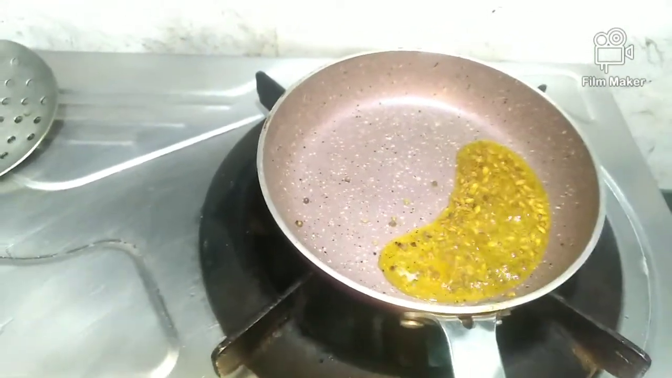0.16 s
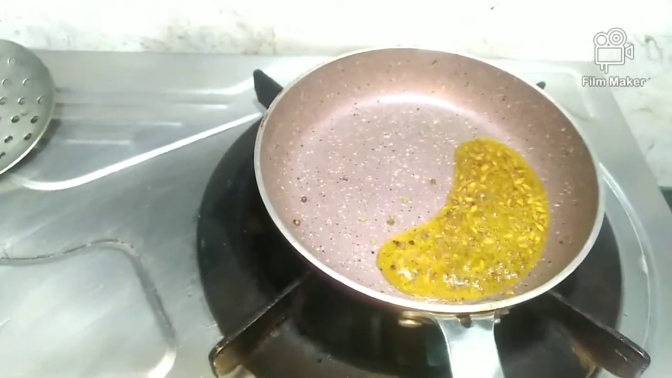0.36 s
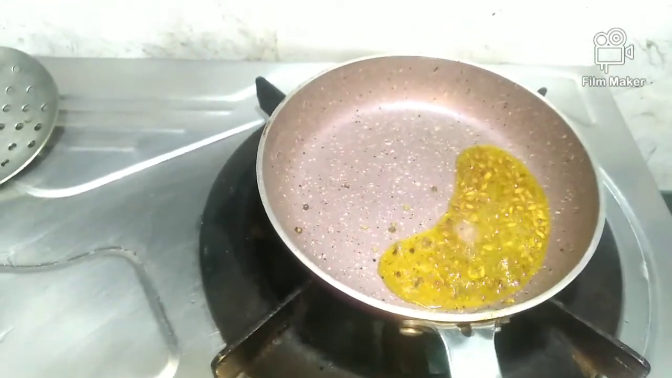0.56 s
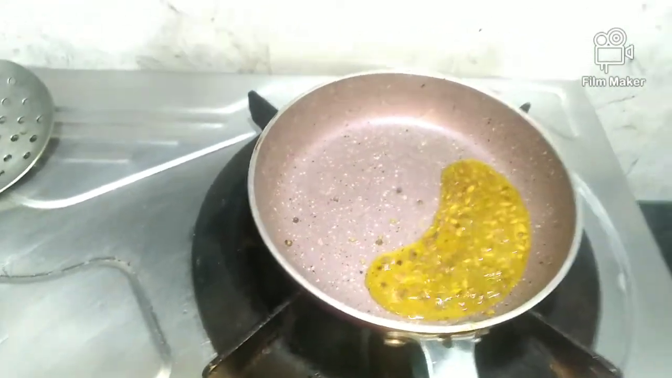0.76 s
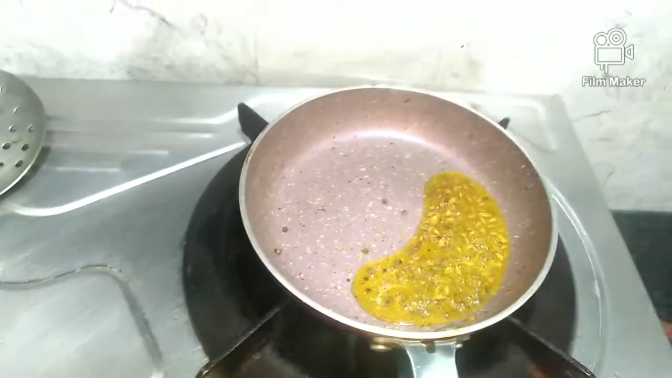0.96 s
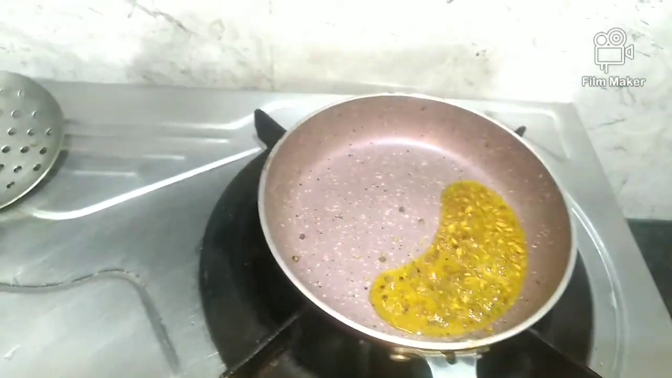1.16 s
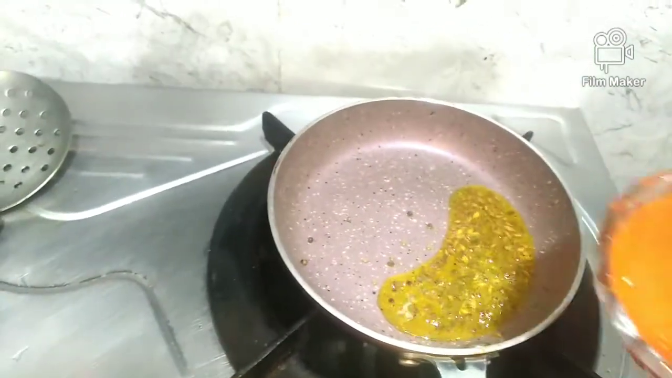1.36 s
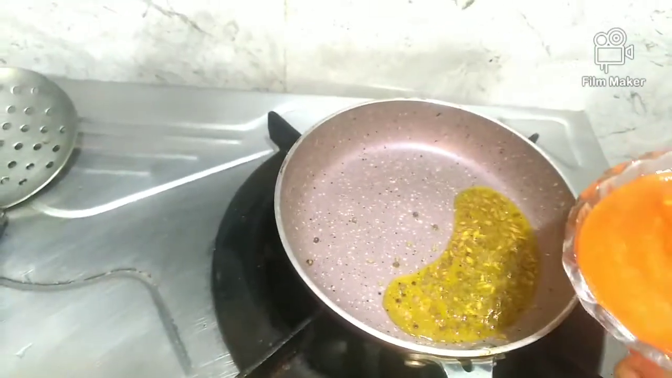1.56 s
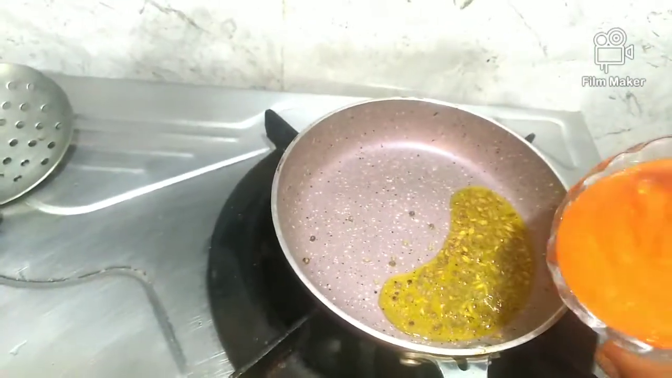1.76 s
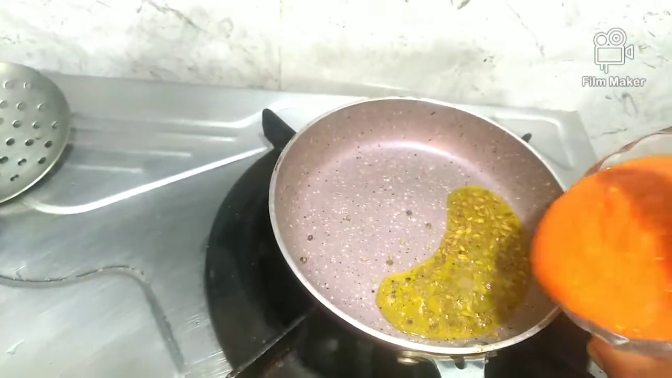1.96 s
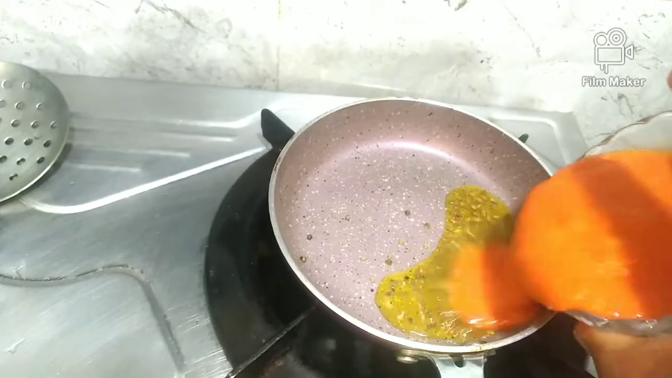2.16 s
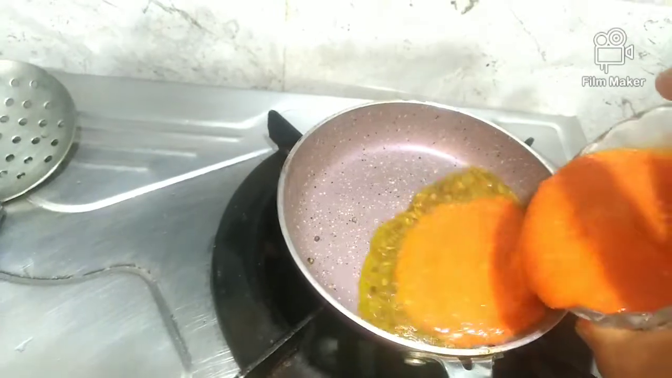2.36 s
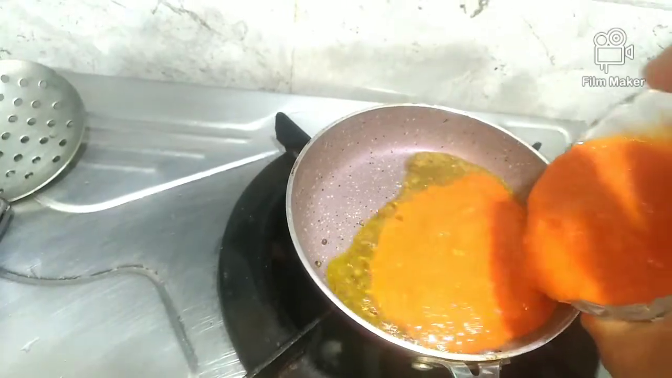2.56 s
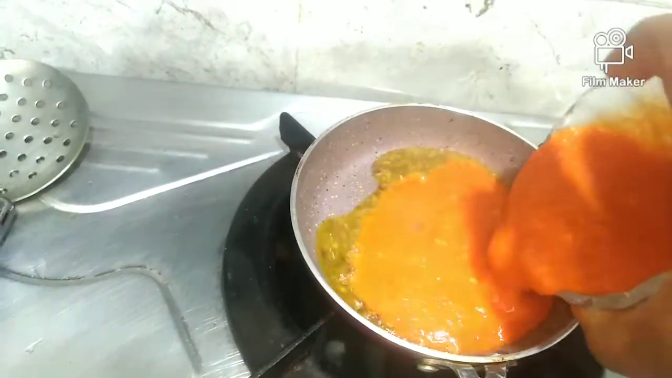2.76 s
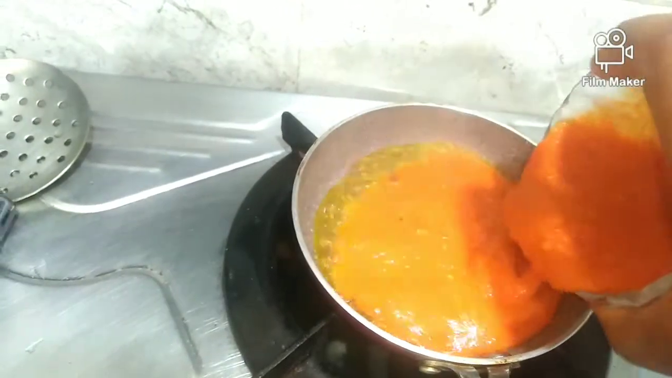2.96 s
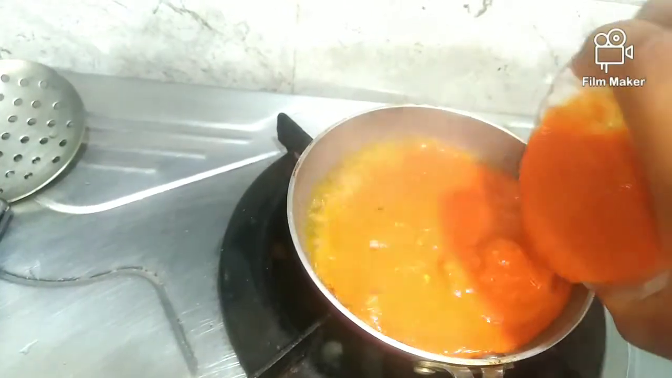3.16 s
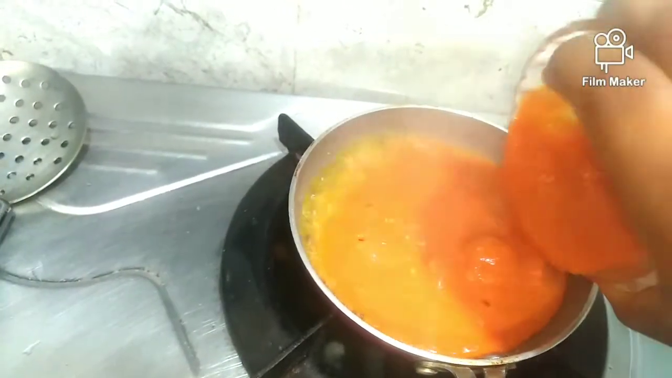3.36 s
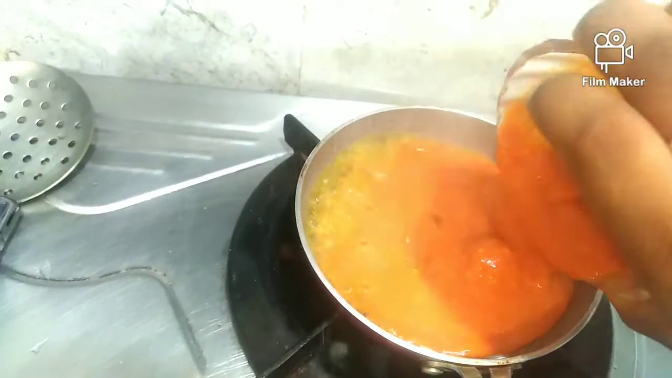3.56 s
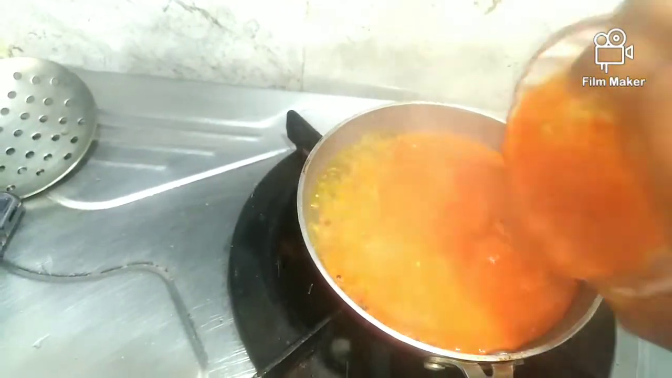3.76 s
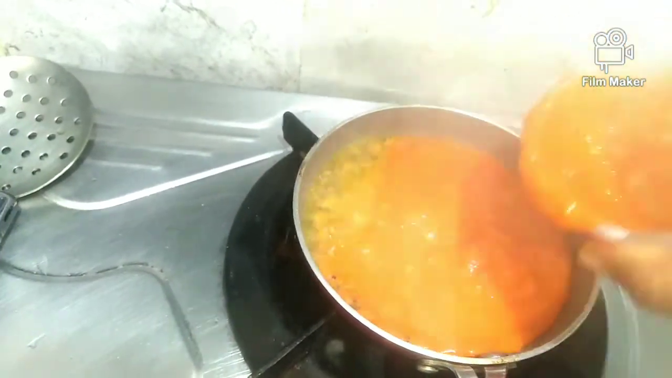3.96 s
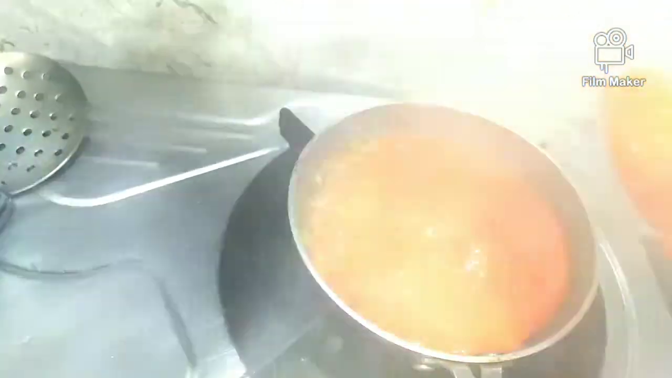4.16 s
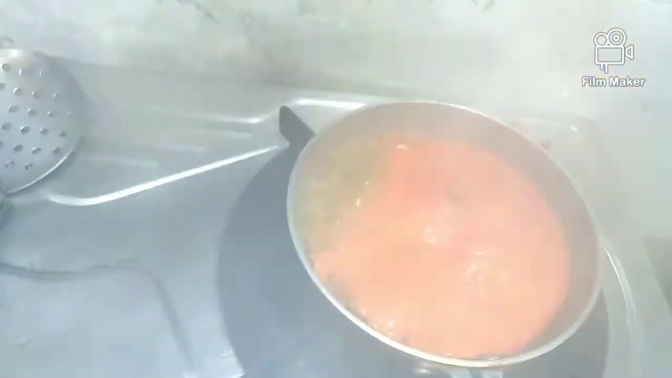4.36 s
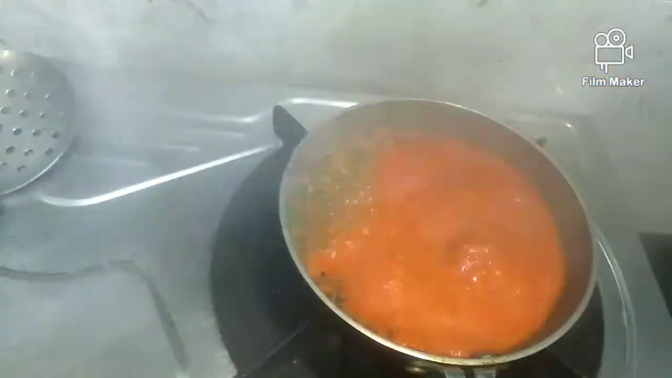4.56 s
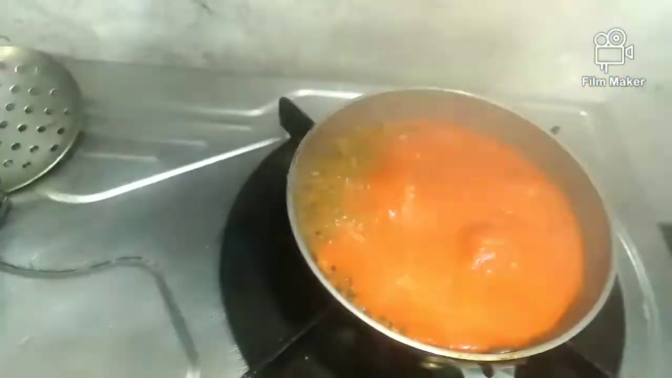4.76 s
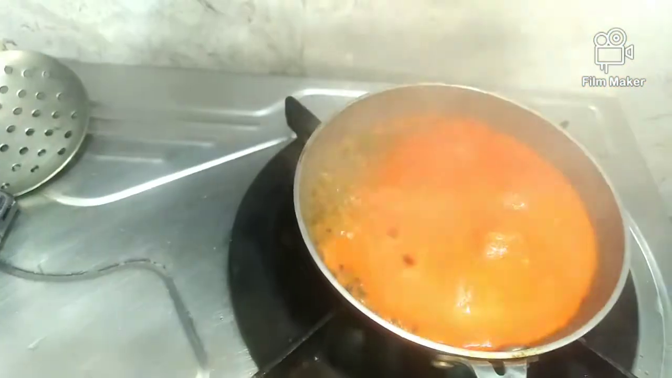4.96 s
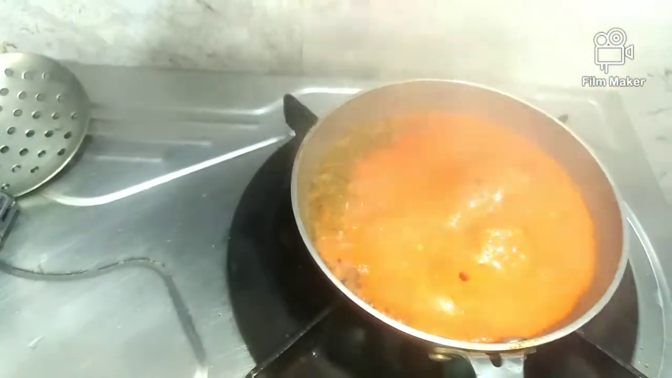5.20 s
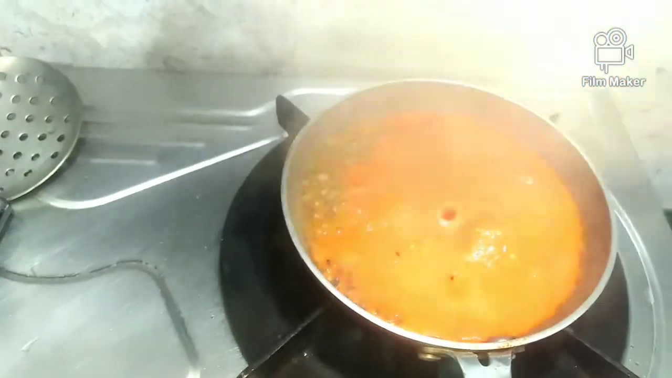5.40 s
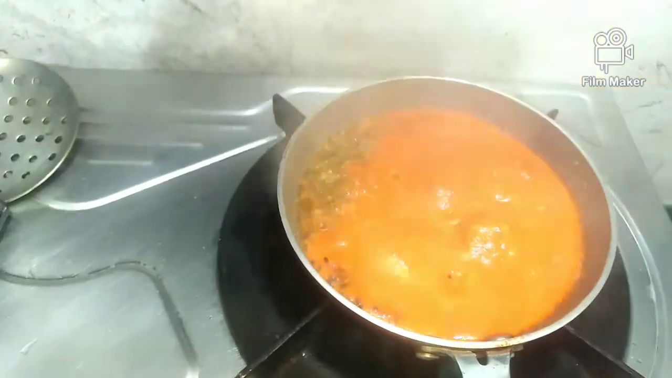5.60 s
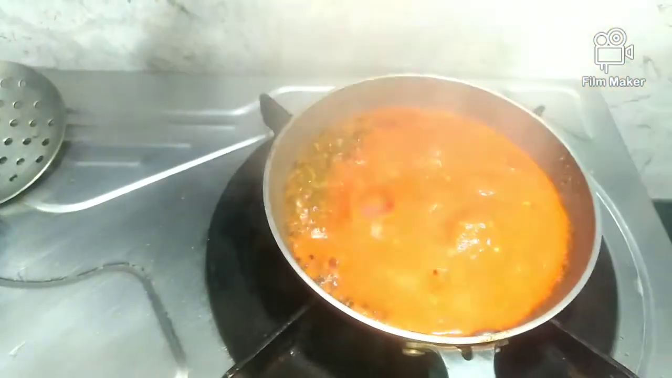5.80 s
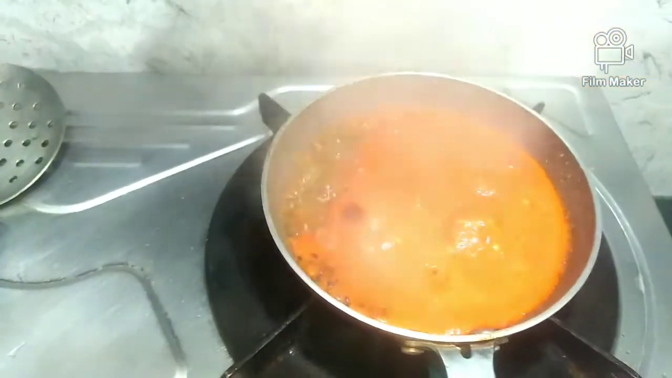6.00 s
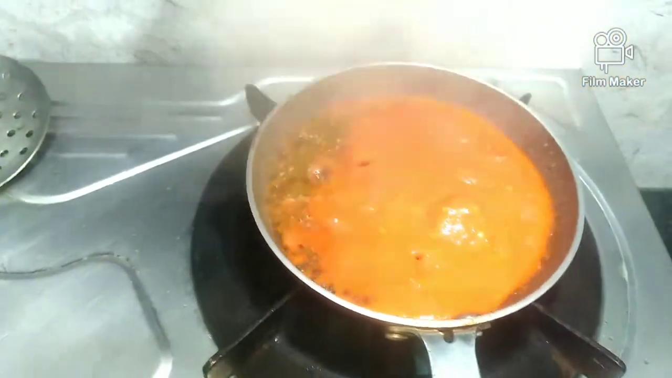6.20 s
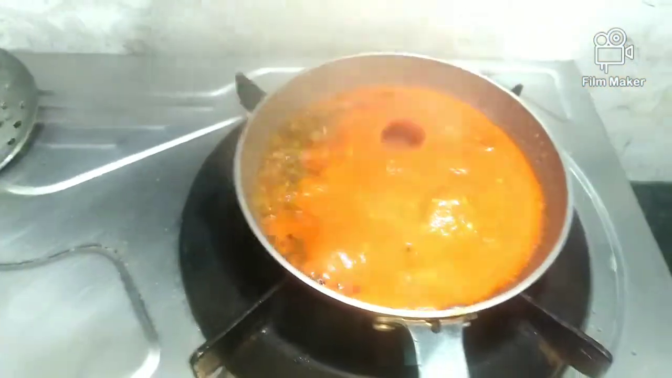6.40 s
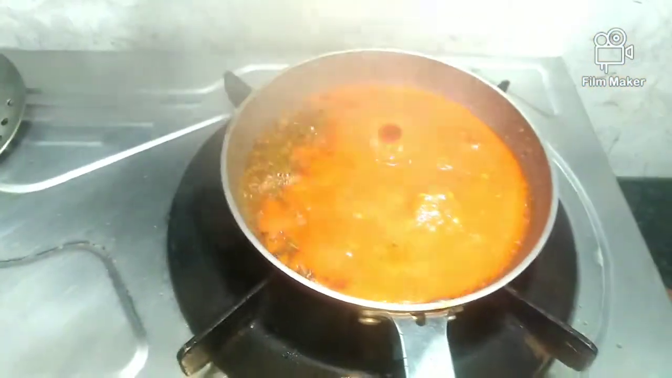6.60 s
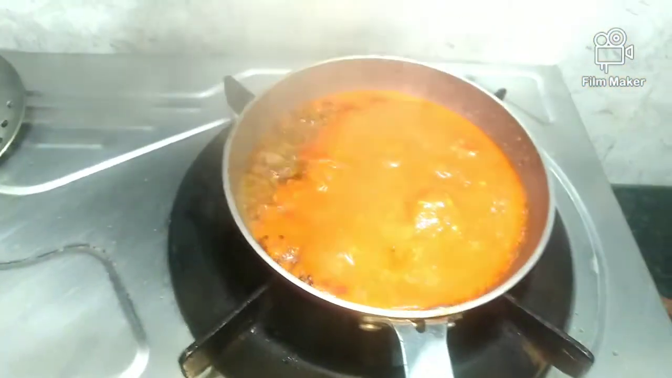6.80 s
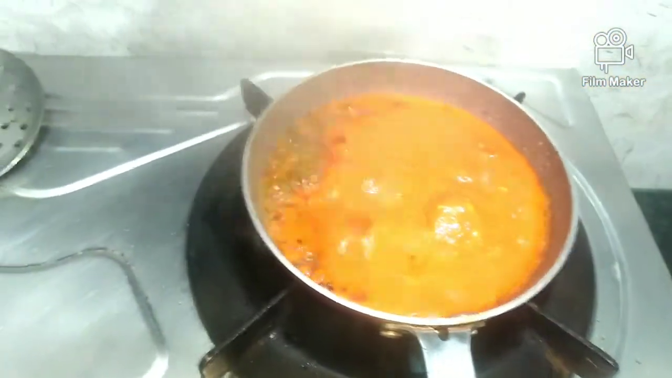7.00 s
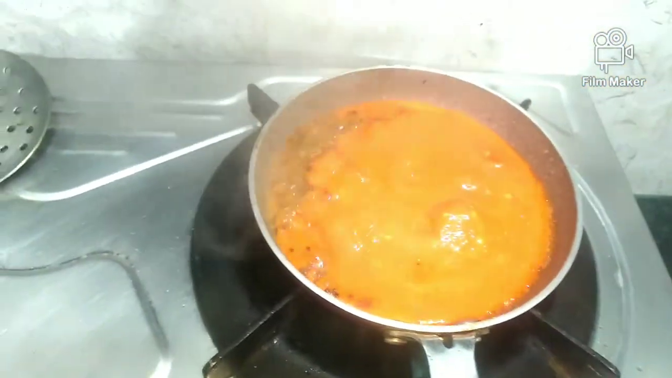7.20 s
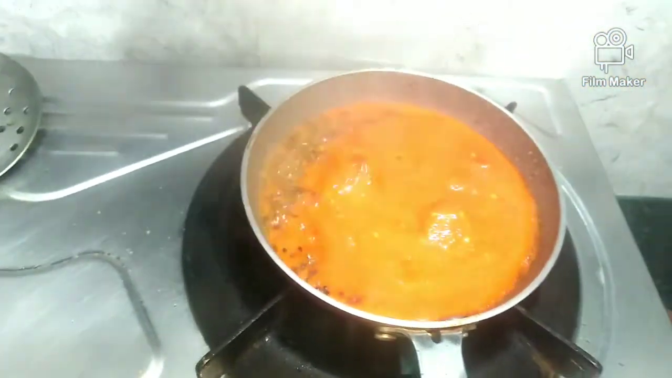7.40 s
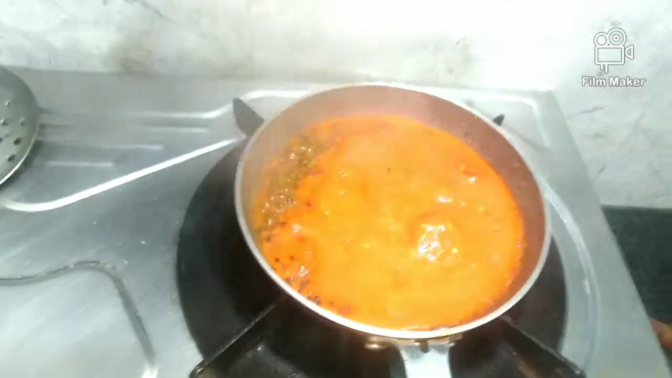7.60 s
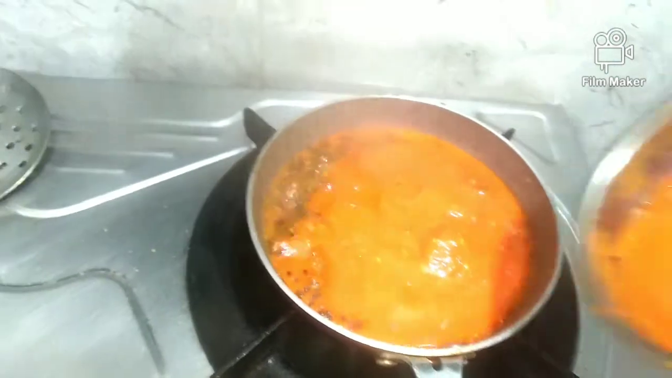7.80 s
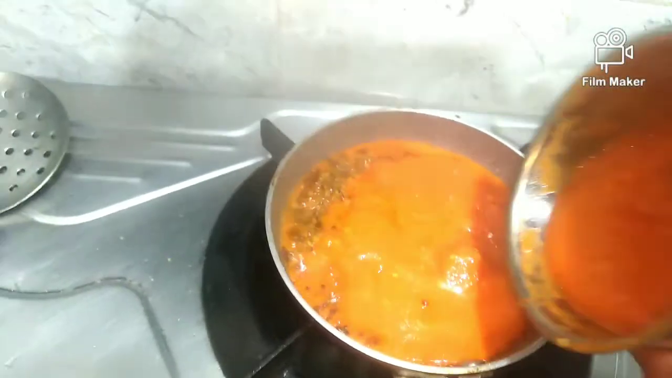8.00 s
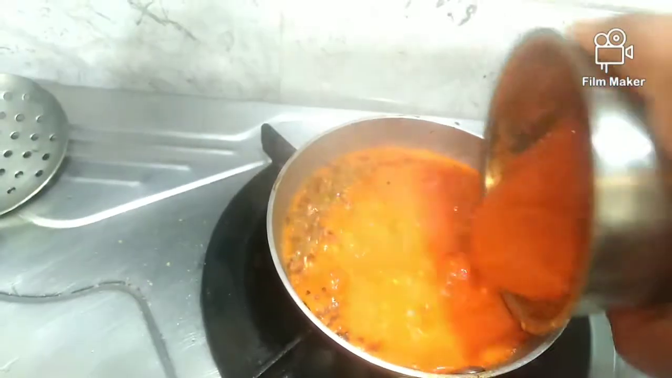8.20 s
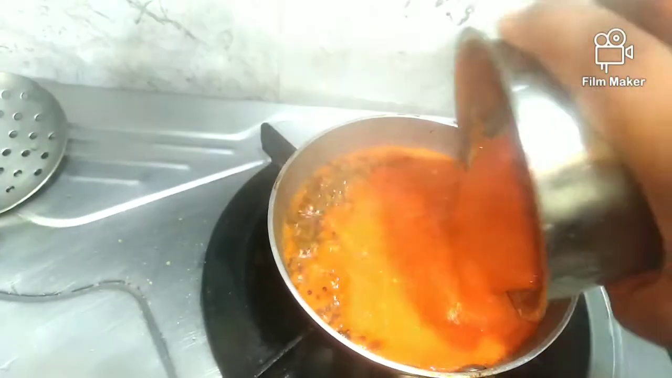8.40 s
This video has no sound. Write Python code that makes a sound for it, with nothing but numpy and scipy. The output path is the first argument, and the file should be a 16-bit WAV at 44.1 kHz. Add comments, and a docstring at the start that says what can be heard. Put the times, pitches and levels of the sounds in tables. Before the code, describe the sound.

Seeds crackle and pop in hot oil, then wet paste is poured in with a loud sizzle that slowly dies down.

```python
"""Seeds and paste in hot oil

Seeds pop in a small frying pan on a gas ring, close by; the hardest pops knock the pan.
Wet paste is poured from a bowl held over it: it plops, its water flashes to steam, the sizzle swells.
The bowl is lifted and the sound opens up, then slowly dies down as the paste cools the pan."""
import sys
import numpy as np
from scipy import signal
from scipy.fft import rfft, irfft
from scipy.io import wavfile

SR = 44100
rng = np.random.default_rng(int(sys.argv[2]) if len(sys.argv) > 2 else 0)


def int16_out(signal):
    """Quantize to a 16-bit WAV file."""
    q = np.round(np.clip(np.atleast_2d(signal).T, -1, 1) * 32767)
    wavfile.write(sys.argv[1], SR, q.astype(np.int16))


N = 372600
TIME = np.arange(N) / SR
BINS_HZ = np.maximum(np.arange(N // 2 + 1) * SR / N, 1)
PASTE_IN_S, LAYER_BUILD_S, BOWL_UP_S = 2.078, 0.33, 3.617
MONO_BELOW_HZ = 4300   # pops and bubbles sound mono below this pitch, wide above it


def from_db(db):
    """Decibels to gain."""
    return 10 ** (np.asarray(db) / 20)


def rms_one(x):
    """Scale the channel mean to rms 1."""
    return x / np.sqrt(np.mean(np.atleast_2d(x).mean(axis=0) ** 2) + 1e-20)


def curve(rows, at_s=TIME):
    """Interpolate each column after the first over time."""
    times_s, *columns = np.transpose(rows)
    return [np.interp(at_s, times_s, column) for column in columns]


def hump(centre_s, half_s):
    """Gaussian of height 1 in time."""
    return np.exp(-.5 * np.minimum(((TIME - centre_s) / half_s) ** 2, 60))


def colour(hz, points, ripple=()):
    """Gain of a broad spectrum with bell-shaped peaks and notches."""
    knots_hz, knots_db = np.transpose(points)
    ripple_db = np.zeros(len(hz))
    for centre_hz, width_hz, height_db in ripple:
        ripple_db += height_db * np.exp(-np.minimum((2 * (hz - centre_hz) / max(width_hz, 60)) ** 2, 20))
    return from_db(np.interp(np.log(hz), np.log(knots_hz), knots_db) + np.clip(ripple_db, -30, 15))


def band(low_hz, high_hz):
    """Steep band-pass gain."""
    return 1 / np.sqrt((1 + (low_hz / BINS_HZ) ** 16) * (1 + (BINS_HZ / high_hz) ** 16))


def filtered(x, gain):
    """Apply a gain per frequency; rms 1."""
    return rms_one(irfft(rfft(x) * gain, N))


def drift(rate_hz):
    """Smooth random curve, rms 1."""
    size = 2 ** 14
    hz = np.arange(size // 2 + 1) * SR / N
    slow = irfft(rfft(rng.standard_normal(size)) / (1 + (hz / rate_hz) ** 4), size)
    return np.interp(np.arange(N) * size / N, np.arange(size), rms_one(slow))


def patches(shape, step_hz, step_s, width_hz, length_s):
    """Smooth random field over frequency and time: unit spread, then clipped."""
    across, along = np.fft.fftfreq(shape[0], step_hz)[:, None], np.fft.rfftfreq(shape[1], step_s)
    smoothing = np.exp(-(across * width_hz) ** 2 - (along * length_s) ** 2)
    field = np.fft.irfft2(np.fft.rfft2(rng.standard_normal(shape)) * smoothing, shape)
    return np.clip(field / field.std(), -2.5, 1.7)


def stereo(mid, side, coherence):
    """Two channels of given coherence from two unrelated signals."""
    coherence = np.clip(coherence, 0, 1)
    return np.sqrt(1 + coherence) * mid + np.sqrt(1 - coherence) * side * np.array([[1], [-1]])


def panned(pan_db):
    """Constant-power gains; positive is left."""
    gains = from_db(np.array([[.5], [-.5]]) * pan_db)
    return gains / np.sqrt(np.mean(gains ** 2, axis=0))


def add(out, sound, start_s):
    """Mix in a short sound."""
    at = int(round(start_s * SR))
    sound = sound[:, max(-at, 0):N - at]
    out[:, max(at, 0):max(at, 0) + sound.shape[1]] += sound


# Flame spectrum: f/Hz, level/dB
FLAME_COLOUR = [(24, -55), (40, -15), (70, -15), (162, 6.5), (242, -2.5), (293, -7), (386, -1.5),
                (640, -4.5), (965, -8.5), (1070, -8), (1340, -19), (1410, -5.5), (1830, -19.5), (2500, -14),
                (3250, -50), (5500, -120)]


def flame(level_db=-59):
    """The gas flame rumbles steadily."""
    noise = stereo(*rng.standard_normal((2, N)), coherence=1)
    rumble = filtered(noise, colour(BINS_HZ, FLAME_COLOUR) * band(20, 2900))
    return from_db(level_db) * rumble * panned(pan_db=-3.5)


def collapses(per_s):
    """Two unrelated trains of tiny steam bubbles bursting at random."""
    bursts = rng.random((2, N)) < per_s / SR
    return bursts * rng.standard_normal((2, N))


# Oil fizz spectrum: f/Hz, level/dB
FIZZ_COLOUR = [(880, -47), (1500, -33), (2250, -24), (3000, 0), (3530, -7), (4100, -2), (4480, -9),
               (5050, 2.5), (5750, 3), (6200, 6), (7300, 9), (8600, 10), (11000, 8.5), (15800, 9.5)]


def oil_fizz(level_db=-55, site_db=3.0, flicker_db=2.2):
    """Tiny bubbles fizz unevenly on the right, each patch at its own pitches."""
    clicks = stereo(*collapses(per_s=7000), coherence=0.31)
    fizz = filtered(clicks, colour(BINS_HZ, FIZZ_COLOUR) * band(1600, 17000))
    hz, s, spectra = signal.stft(fizz, SR, nperseg=1024)
    sites_db = site_db * patches(spectra.shape[1:], hz[1], s[1], width_hz=250, length_s=0.11)
    fizz = rms_one(signal.istft(spectra * from_db(sites_db), SR)[1][:, :N])
    return from_db(level_db + flicker_db * drift(21)) * fizz * panned(pan_db=-12.5)


# Bursting seeds: t/s, body/dB, crack/dB, snap/dB, tick/dB, ring/Hz, near-rim delay/ms
SEED_POPS = [(0.016, -41, -34, -23, -28, 2700, 0.78), (0.081, -46, -38.5, -19.5, -27, 7760, 0.31),
             (0.157, -38, -38.5, -19, -14, 2700, 1.55), (0.34, -43, -51, -33.5, -27.5, 8200, 0.39),
             (0.519, -34, -44.5, -24.5, -27, 8600, 0.26), (0.597, -30, -31, -16.5, -9, 2630, 0.6),
             (0.659, -43, -49, -27.5, -26, 6950, 0.51), (0.716, -40, -50, -37, -38, 8700, 0.28),
             (1.101, -33, -30.5, -26, -15.5, 9000, 0.25), (1.132, -56, -37, -37, -47, 4120, 0.49),
             (1.212, -56, -50, -33.5, -62, 6650, 0.34), (1.319, -45, -31, -42, -44, 3740, 0.26),
             (1.455, -32.5, -20, -13, -16.5, 2330, 0.34), (1.548, -38, -32.5, -18, -21.5, 2000, 0.27),
             (1.638, -46, -41.5, -35, -44, 3520, 0.3), (1.793, -45.5, -33.5, -30, -34, 3060, 0.247),
             (2.01, -38, -31.5, -14.5, -13.5, 6000, 0.35), (2.081, -47, -33.5, -37, -52, 3440, 0.25),
             (2.141, -45, -45, -30, -45, 9130, 0.42), (2.242, -38, -49, -28, -25, 8150, 0.58),
             (2.459, -40, -28, -29, -33, 4600, 0.7), (2.537, -47, -49, -19, -23, 7540, 0.82)]
# Pan response to a pop: f/Hz, width/Hz, gain/dB
POP_MODES = [(650, 120, 9.5), (950, 180, -10), (1620, 190, 4), (2130, 200, -4), (2610, 620, 7),
             (3700, 160, 3.5), (4170, 780, -3), (6940, 180, 4), (7850, 200, -4), (8410, 140, 8),
             (8550, 180, 2), (9170, 150, 4.5), (9900, 370, -2), (12700, 500, -5), (13270, 170, 1),
             (15025, 1600, -6)]


def pops(rise_s=0.006, fall_s=0.0082, spatter_db=-13, spatter_s=0.018, room_db=-21.5, room_t60_s=0.48,
         ring_width_hz=850, ring_db=7.5, near_gain=0.37, far_gain=0.6, grain_db=1.3):
    """A seed bursts: a ringing spit of steam, a spatter of oil, then the kitchen's tail."""
    size, lead_s = 2 ** 14, .03
    t, hz = np.arange(size) / SR - lead_s, np.maximum(np.arange(size // 2 + 1) * SR / size, 1)
    burst = np.exp(-.5 * np.abs(t / np.where(t < 0, rise_s, fall_s)) ** 2.08)
    after_s, handover = np.maximum(t, 0), np.sqrt((t > 0) * (1 - burst))
    direct = np.hypot(burst, handover * from_db(spatter_db) * np.exp(-after_s / spatter_s))
    tail = handover * from_db(room_db - 60 * after_s / room_t60_s)
    walls = colour(hz, [(1400, 7), (2700, 5.1), (4000, 13.4), (7000, 3.6), (14000, 2)])
    metal = colour(hz, [(1, 0), (SR, 0)], POP_MODES)
    coherence = np.where(hz < MONO_BELOW_HZ, .99, .45)
    comb_norm = np.sqrt(2 * (1 + near_gain ** 2 + 2 * far_gain ** 2))
    out = np.zeros((2, N))
    for s, body_db, crack_db, snap_db, tick_db, ring_hz, rim_ms in SEED_POPS:
        shape = [(200, body_db - 21), (1200, body_db), (3000, crack_db),
                 (7500, snap_db), (13000, tick_db)]
        # each seed lies elsewhere, so its rim echoes differ
        delays_ms = np.array([[rim_ms], [rng.uniform(1.2, 2.2)], [rng.uniform(2.4, 4)]])
        near, *far = np.exp(-2j * np.pi * hz * delays_ms / 1000)
        comb = np.abs(1 + near_gain * near + far_gain * sum(far)) / comb_norm
        gain = colour(hz, shape, [(ring_hz, ring_width_hz, ring_db)]) * metal * comb
        spit, wash = [stereo(*rfft(rng.standard_normal((2, size))), coherence) * gain for _ in range(2)]
        sound = irfft(spit, size) * direct + irfft(wash * walls, size) * tail
        add(out, sound * panned(pan_db=-1), s - lead_s)
    husk_snaps = rms_one(from_db(grain_db * np.clip(drift(500), -2, 2)))
    return out * husk_snaps * np.minimum(TIME / rise_s, 1)


# The hardest pops knock the pan: t/s, level/dB
KNOCKS = [(0.598, -21), (1.102, -21), (1.458, -30.5), (2.013, -32)]
# Knock and rattle spectra: f/Hz, level/dB
KNOCK_COLOUR = [(40, -36), (90, -14), (140, 4), (260, 5), (400, -1), (520, -35), (700, -5), (1000, -23),
                (1600, -16.5), (2500, -20), (5000, -60)]
RATTLE_COLOUR = [(150, -17), (400, 10), (520, -15), (700, 6), (900, -3), (1100, 8), (1500, 2), (1900, -7),
                 (2600, -20), (5000, -50)]


def knocks(lag_s=0.00964, body_hz=200, ring_hz=1450, ring_db=-29, ring_t60_s=0.19,
           rattle_db=-16.5, rattle_s=0.007):
    """Bending waves cross the pan, short ones first: a snap falls to a thump, with rattle and ring."""
    size, lead_s = 2 ** 15, .03
    t, hz = np.arange(size) / SR - lead_s, np.maximum(np.arange(size // 2 + 1) * SR / size, 1)
    cycles = hz * (lead_s - lag_s) + 2 * lag_s * np.sqrt(body_hz * hz)   # travel time ~ 1 / sqrt(f)
    snap = irfft(colour(hz, KNOCK_COLOUR) * np.exp(-2j * np.pi * cycles), size)
    snap /= np.abs(snap).max()
    after_s = np.maximum(t, 0)
    ring = from_db(ring_db - 60 * after_s / ring_t60_s) * np.sin(2 * np.pi * ring_hz * after_s)
    shaking = from_db(rattle_db) * np.exp(-.5 * (t / rattle_s) ** 2)
    out = np.zeros((1, N))
    for s, level_db in KNOCKS:
        rattle = rms_one(irfft(rfft(rng.standard_normal(size)) * colour(hz, RATTLE_COLOUR), size))
        add(out, from_db([[level_db]]) * (shaking * rattle + ring - snap), s - lead_s)
    return out


# Spray band trim: t/s, gain/dB
SPRAY_TRIM = [(2.3, 2.5), (2.62, 4), (2.85, 2), (3.1, -1.5), (3.42, -2), (3.65, -5), (4.05, -3.5),
              (4.4, -2), (4.65, -1), (5.05, -0.5), (5.7, 0), (6.5, 1.5), (7.5, 4), (8.3, 10)]


def band_levels(vigour, responses, surge_db=0, reference_db=-24):
    """One vigour drives gurgle, boil, hiss and spray, each by its own slope; in dB."""
    vigour_db = curve(vigour)[0] + surge_db - reference_db
    gurgle, boil, hiss, spray = [level_db + slope * vigour_db for level_db, slope in responses]
    return [gurgle, boil, hiss, spray + curve(SPRAY_TRIM)[0]]


# Edges of the gurgle, boil, hiss and spray bands: f/Hz
BAND_EDGES_HZ = [60, 800, 4300, 10500, 17000]


def sizzle(levels_db, pan_db, gain, spurt_db, spurt_hz, flicker_db, gurgle_flicker_db):
    """Steam escapes in spurts; each bubble size, from large to fine spray, fills its own band."""
    spurts = drift(spurt_hz)
    bursts_per_s = [3424, 16000, 36000, 36000]
    pan_share, coherence = [0.676, 0.34, 0.68, 1.05], [1, 1, .46, .18]
    flickers_db = [gurgle_flicker_db, flicker_db, flicker_db, flicker_db]
    off_centre_loss = 0.045 * np.maximum(np.abs(pan_db) - 2.5, 0)
    out = 0
    for k, level_db in enumerate(levels_db):
        mid, side = irfft(rfft(collapses(bursts_per_s[k])) * gain * band(*BAND_EDGES_HZ[k:k + 2]), N)
        pair = rms_one(stereo(mid, side, coherence[k] * (1 - off_centre_loss)))
        flutter_db = spurt_db * spurts + flickers_db[k] * drift(22.4)
        out = out + pair * from_db(level_db + flutter_db) * panned(pan_share[k] * pan_db)
    return out


# Sizzle spectrum under the bowl: f/Hz, level/dB
POURING_COLOUR = [(60, -28.1), (100, -21), (160, -13.5), (350, -6.0), (800, -11.5), (1500, -13), (2600, -6),
                  (4500, -5), (6500, 10), (8700, 12), (10500, 9), (12500, 6.5), (15000, 3)]
# Notches that hollow out the sizzle during the pour, and one peak: f/Hz, width/Hz, gain/dB
POURING_NOTCHES = [(425, 48, -15), (530, 100, -24), (928, 240, -15), (1044, 58, 8.5), (1110, 49, -19),
                   (1250, 60, -15), (1354, 103, -23), (1690, 310, -8), (2020, 52, -19), (2190, 130, -31),
                   (2250, 110, -12.4), (2320, 90, -27.5), (2550, 58, -24), (2696, 170, -21),
                   (2730, 120, -12), (3085, 80, -14), (3340, 260, -10), (3540, 99, -22), (3920, 110, -32),
                   (4140, 180, -30), (4328, 120, -16), (6480, 170, -13), (7100, 150, -8), (7850, 280, -16),
                   (8840, 220, -8), (9600, 270, -16)]
# Steam puffs from under the bowl: t/s, height/dB
PUFFS = [(2.608, 6), (2.66, 4.5), (2.713, 6), (2.774, 6), (2.83, 1.5), (2.875, 4), (2.952, 4), (3.02, 4.5),
         (3.083, 4), (3.134, 5.5), (3.178, 3), (3.23, 4.5), (3.286, 4), (3.359, 3.5), (3.406, 4),
         (3.474, 3), (3.554, 1.5)]


def pouring(levels_db, pan_db, spread_s=0.1, puff_s=0.0093, lull_db=-1.5):
    """Paste spreads and fries in puffs under the bowl; large bubbles need a layer to build first."""
    landed = np.clip((TIME - PASTE_IN_S) / spread_s, 0, 1)
    layer = np.clip((TIME - PASTE_IN_S) / LAYER_BUILD_S, 0, 1) ** 2
    puff_db = lull_db + sum(height_db * hump(s, puff_s) for s, height_db in PUFFS)
    contact_loss_db, puff_share = [22, 11.6, 13, 16], [0.25, 0.17, 1, 0.93]
    puffing_db = [level_db - loss_db * (1 - layer) + share * puff_db
                  for level_db, loss_db, share in zip(levels_db, contact_loss_db, puff_share)]
    return landed * sizzle(puffing_db, pan_db, colour(BINS_HZ, POURING_COLOUR, POURING_NOTCHES),
                           spurt_db=0.86, spurt_hz=45, flicker_db=0.85, gurgle_flicker_db=1.4)


# Backsplash and wall echoes: delay/ms, level/dB
ECHOES = [(5.35, -11), (10.62, -11.5), (17.8, -15), (23.5, -17.5)]


def echoes(x, sway_ms=0.032, sway_hz=3, highpass_hz=1500):
    """Near surfaces reflect the treble; the listening point sways, so their comb keeps shifting."""
    treble_gain = 1 / (1 + (highpass_hz / BINS_HZ) ** 4)
    treble = irfft(rfft(x) * treble_gain, N)
    out, power = x.copy(), 0
    for delay_ms, echo_db in ECHOES:
        read_s = TIME - (delay_ms + sway_ms * drift(sway_hz)) / 1000
        out += from_db(echo_db) * np.array([np.interp(read_s, TIME, channel) for channel in treble])
        power += from_db(echo_db) ** 2
    return irfft(rfft(out) / np.sqrt(1 + 0.51 * power * treble_gain ** 2), N)


# Treble hollow with a crest below it: t/s, f/Hz, hollow/dB, crest/dB
HOLLOW = [(3.65, 11150, -4.5, 2), (4.4, 10600, -3.5, 1.5), (5.2, 10800, -4.5, -0.5), (5.7, 11200, -3.5, 0),
          (6.15, 11800, -6, -0.5), (6.65, 13700, -5, 1), (7.5, 13600, -4, -1.5), (7.9, 12500, -5.5, -2),
          (8.4, 11200, -6, 1.5)]


def colour_flicker(x, slow_db=2.7, fast_db=2.5, fast_top_hz=6800, width_hz=1000, crest_ratio=0.76):
    """The sizzle's colour flickers in random narrow patches and dips; a hollow glides in the treble."""
    hz, s, spectra = signal.stft(x, SR, nperseg=1024)
    grid = (spectra.shape[1:], hz[1], s[1])
    slow = patches(*grid, width_hz=160, length_s=0.37)
    fast = patches(*grid, width_hz=300, length_s=0.067) / (1 + (hz[:, None] / fast_top_hz) ** 4)
    centre_hz, hollow_db, crest_db = curve(HOLLOW, s)
    hollow = np.exp(-.5 * ((hz[:, None] - centre_hz) / width_hz) ** 2)
    crest = np.exp(-.5 * ((hz[:, None] - crest_ratio * centre_hz) / width_hz) ** 2)
    gain = from_db(slow_db * slow + fast_db * fast + hollow_db * hollow + crest_db * crest)
    return signal.istft(spectra * gain, SR)[1][:, :N]


# Wet splutters: t/s, level/dB, f/Hz, half length/s
SPLUTTERS = [(2.34, -43.5, 1240, 0.039), (2.433, -44, 676, 0.011), (4.707, -62, 2220, 0.0075),
             (5.09, -50, 490, 0.099), (5.32, -35, 2700, .014), (5.322, -44.5, 800, 0.011),
             (5.335, -34, 1600, 0.027), (5.338, -44.5, 440, 0.034), (5.688, -46.5, 1050, 0.025),
             (5.695, -38.5, 5040, .025), (5.87, -41, 2600, 0.044), (7.284, -51, 4400, 0.026),
             (7.866, -50, 2040, 0.03), (8.05, -48, 2350, 0.02), (8.12, -49, 2430, .045),
             (8.154, -47, 5630, 0.054), (8.227, -54, 2430, .03)]


def splutters(width_octaves=0.47):
    """Paste spreads or a steam pocket breaks through: a brief rush of bubbles around one pitch."""
    out = np.zeros(N)
    for s, level_db, centre_hz, half_s in SPLUTTERS:
        gain = np.exp(-.5 * (np.log2(BINS_HZ / centre_hz) / width_octaves) ** 2)
        out += from_db(level_db) * filtered(rng.standard_normal(N), gain) * hump(s, half_s)
    return out * panned(pan_db=-2.5)


def bubbles(hiss_db, from_s, to_s, spectrum, ripple, level_db, count,
            low_hz=1400, high_hz=12000, ring_s=0.017, spread_db=5.5):
    """Small bubbles ring briefly, each at its own pitch; their level follows the hiss."""
    when, pitch, phase, far_phase = rng.random((count, 4)).T
    start_s, hz = from_s + when * (to_s - from_s), low_hz + (high_hz - low_hz) * pitch
    scatter_db = spread_db * np.clip(rng.standard_normal(count), -2, 1.5)
    gain = from_db(np.interp(start_s, TIME, hiss_db) + level_db + scatter_db)
    gain *= colour(hz, spectrum, ripple)
    t = np.arange(900) / SR
    envelope = gain[:, None] * t / ring_s * np.exp(1 - t / ring_s) * (1 - t / t[-1])
    at = ((start_s * SR).astype(int)[:, None] + np.arange(len(t))).ravel()
    phases = [phase, np.where(hz < MONO_BELOW_HZ, phase, far_phase)]
    rings = [envelope * np.sin(2 * np.pi * (p[:, None] + hz[:, None] * t)) for p in phases]
    return np.array([np.bincount(at, channel.ravel(), N)[:N] for channel in rings])


# Lumps landing and thick bubbles opening: t/s, level/dB
PLOPS = [(2.715, -33), (2.776, -22.5), (2.965, -30), (3.028, -26), (3.085, -28), (5.32, -33), (5.685, -34)]
# Plop spectrum: f/Hz, level/dB
PLOP_COLOUR = [(50, -30), (90, -21), (130, 0.5), (230, -1), (350, -2), (520, -4), (700, -4), (1000, -13),
               (1500, -13), (2500, -32), (5000, -70)]


def plops(push_s=0.00048, rattle_db=4.5, rattle_s=0.0044, trim_db=-2.0):
    """Each plop is one low push on the pan inside a brief dull rattle."""
    force = np.zeros(N)
    for s, level_db in PLOPS:
        near = np.abs(TIME - s) < .06
        t = TIME[near] - s
        push = -np.exp(-.5 * (t / push_s) ** 2)
        rattle = from_db(rattle_db) * rng.standard_normal(len(t)) * np.exp(-np.abs(t) / rattle_s)
        force[near] += from_db(level_db + trim_db) * (push + rattle)
    return irfft(rfft(force) * colour(BINS_HZ, PLOP_COLOUR), N)


# Open-pan sizzle spectrum: f/Hz, level/dB
FRYING_COLOUR = [(60, -33), (100, -38.5), (160, -23.5), (350, -27), (800, -20.5), (1500, -23.5),
                 (2600, -16), (4500, -16.5), (6500, -5), (8700, 4.5), (10500, -2.5), (12500, -5.5),
                 (15000, -5)]
# Narrow peaks and notches in the open sizzle's colour: f/Hz, width/Hz, gain/dB
FRYING_RIPPLE = [(225, 60, -5), (353, 64, 8.5), (410, 54, -11), (570, 68, -11), (760, 46, -13.5),
                 (940, 170, -10.5), (1106, 48, -18.5), (1441, 46, 13), (1470, 230, -4.5), (1790, 54, -7),
                 (2054, 56, 12.5), (2064, 123, -14), (2390, 210, 3.5), (2490, 69, -11), (2570, 74, 1.5),
                 (2704, 85, -9), (3147, 200, -8), (3425, 86, -14), (3666, 203, -10.5), (3775, 76, 9.5),
                 (3855, 155, -18.5), (4200, 52, -42), (4500, 68, -14), (5880, 120, -11), (7140, 110, -1),
                 (7360, 130, 1), (7840, 370, -2.5), (9140, 120, -12), (9420, 240, 3), (14600, 550, 5)]


def frying(levels_db, pan_db, spurt_db=0.71, growth_db_per_s=0.0336):
    """Paste fries in the open pan, more fitfully as it cools."""
    fitful_db = spurt_db + growth_db_per_s * np.maximum(TIME - BOWL_UP_S, 0)
    return sizzle(levels_db, pan_db, colour(BINS_HZ, FRYING_COLOUR, FRYING_RIPPLE),
                  spurt_db=fitful_db, spurt_hz=40.8, flicker_db=0.98, gurgle_flicker_db=2.0)


def lean(surge_db, from_s=4.71, takes_s=0.49, pan_db=-9):
    """Balance in dB: the fading sizzle shifts right; surges pull it towards the middle."""
    return np.clip((TIME - from_s) / takes_s, 0, 1) * (pan_db + surge_db)


# Sizzle vigour as the paste spreads, then as it cools the pan: t/s, level/dB
SWELL = [(2.3, -26.5), (2.376, -29.5), (2.586, -26.5), (2.838, -24.5), (3.6, -23)]
COOLING = [(3.68, -19.5), (4.87, -24.5), (4.93, -25), (7.01, -31), (7.51, -35), (8.44, -39)]
# Gurgle, boil, hiss, spray, under the bowl and in the open: level/dB, slope/(dB per dB of vigour)
POURING_BANDS = [(-51, 0.23), (-37.5, 0.48), (-27.5, 2.1), (-25.5, 3)]
FRYING_BANDS = [(-56.5, .5), (-39, 0.84), (-26.5, 0.77), (-25.5, 1.5)]
# Steam pockets breaking out, and lulls: t/s, vigour change/dB, half length/s
SURGES = [(3.635, 1.0, 0.024), (3.865, 0.7, 0.022), (4.33, 1, 0.02), (4.58, 1, 0.12), (4.95, -0.5, 0.038),
          (5.192, 1, 0.037), (5.684, 2, 0.019), (5.847, 1.5, 0.037), (6.075, -0.1, 0.15), (6.268, 2, 0.032),
          (6.94, -3.5, 0.04), (7.05, 2.5, 0.038), (7.213, -2.5, 0.027), (7.324, 1.5, 0.027),
          (7.6, -1.5, 0.036), (7.702, 2.5, 0.083), (7.993, -0.5, 0.035), (8.254, 1.7, 0.027)]


def scene(lift_s=0.025):
    """Stove, seeds and paste; the sizzle crossfades to the open pan as the bowl lifts."""
    lumps = plops()
    surge_db = sum(height_db * hump(s, half_s) for s, height_db, half_s in SURGES)
    pouring_db = band_levels(SWELL, POURING_BANDS)
    frying_db = band_levels(COOLING, FRYING_BANDS, surge_db)
    pan_db = lean(surge_db)
    under_bowl = (pouring_db[2], PASTE_IN_S + LAYER_BUILD_S, BOWL_UP_S, POURING_COLOUR, POURING_NOTCHES)
    open_pan = (frying_db[2], BOWL_UP_S, N / SR, FRYING_COLOUR, FRYING_RIPPLE)
    wet = bubbles(*under_bowl, level_db=-11.5, count=400, low_hz=4530)
    wet += bubbles(*open_pan, level_db=-2.0, count=3000)
    # water droplets spit in the oil: lower, much shorter
    spits = bubbles(*open_pan, level_db=3.0, count=600, low_hz=2790, high_hz=6460,
                    ring_s=0.0019, spread_db=2.5)
    out = flame() + oil_fizz() + pops() + knocks() + splutters() + lumps
    lifted = np.clip((TIME - BOWL_UP_S) / lift_s + .5, 0, 1)
    paste = np.sqrt(1 - lifted) * pouring(pouring_db, pan_db)
    paste += np.sqrt(lifted) * frying(frying_db, pan_db)
    return out + colour_flicker(echoes(paste)) + (wet + spits) * panned(pan_db)


def record(dry):
    """Steep low-pass and a click-free start."""
    cutoff_hz, edge_hz, fade_s = 15850, 200, .005
    lowpass = np.clip((cutoff_hz - BINS_HZ) / edge_hz + .5, 0, 1)
    return irfft(rfft(dry) * lowpass, N) * np.minimum(TIME / fade_s, 1) ** 2


dry = scene()
out = record(dry)
int16_out(out)
```